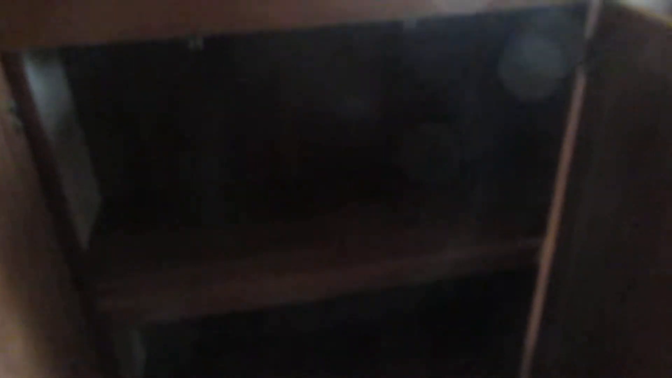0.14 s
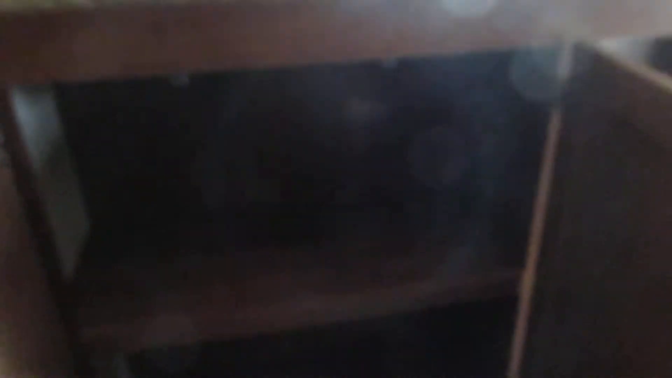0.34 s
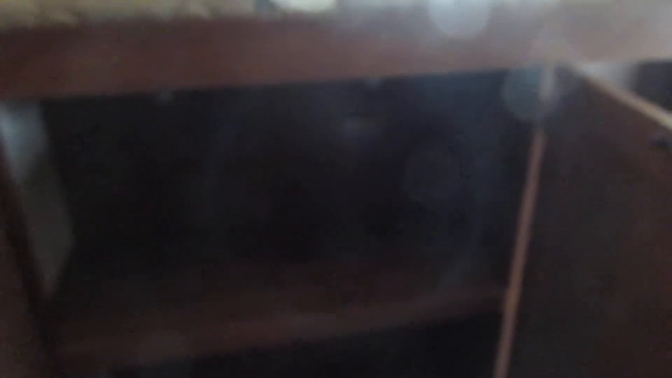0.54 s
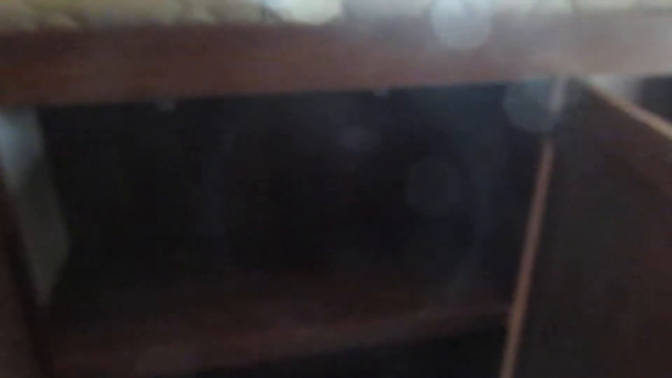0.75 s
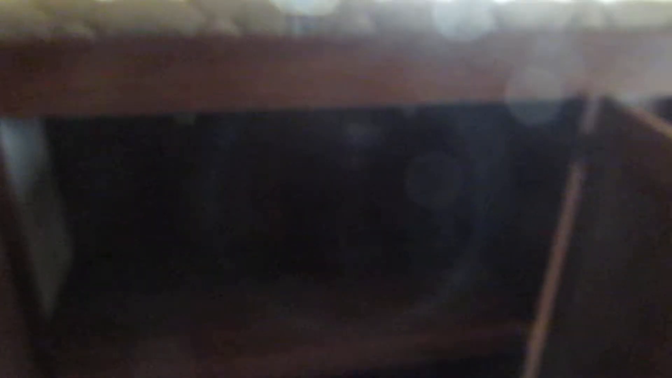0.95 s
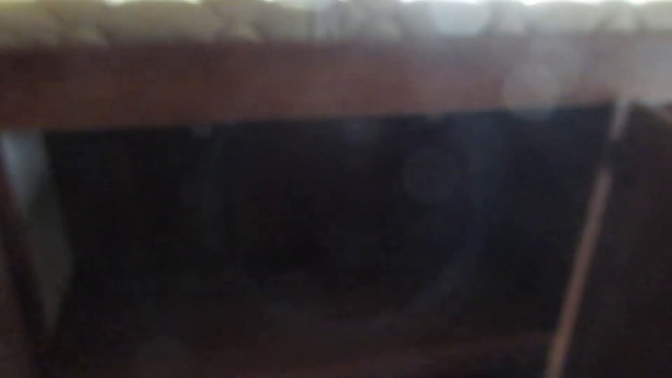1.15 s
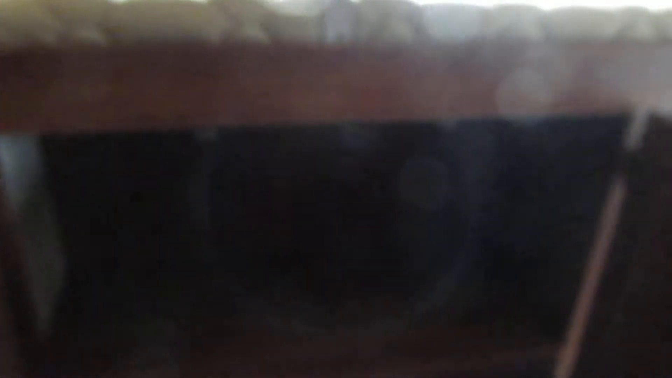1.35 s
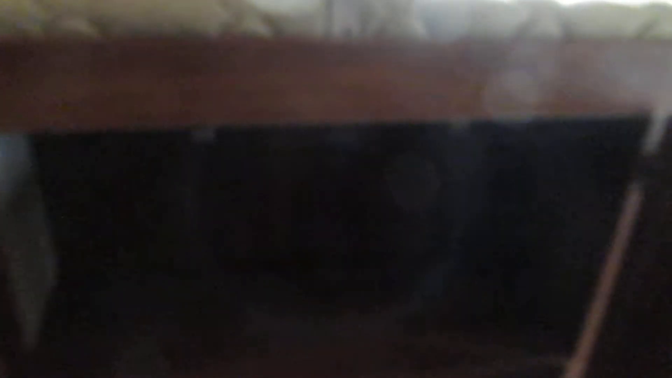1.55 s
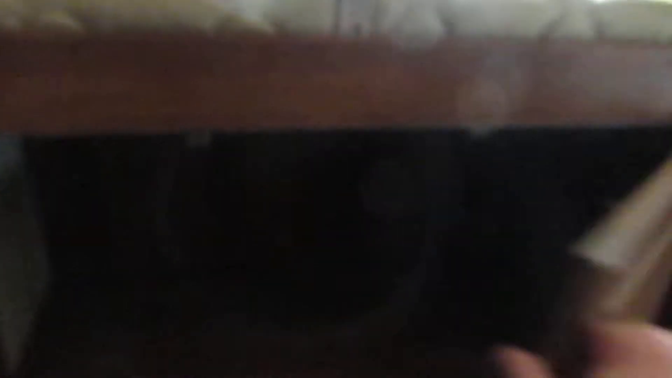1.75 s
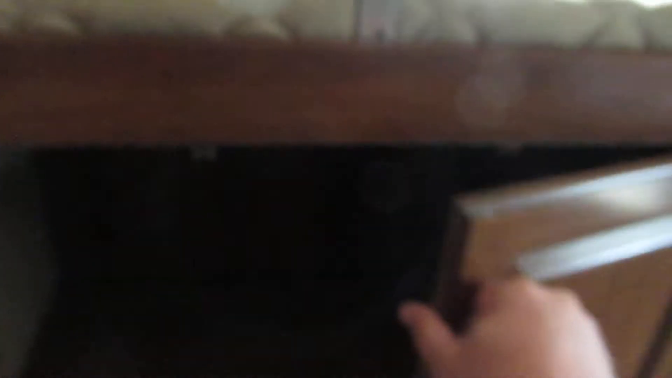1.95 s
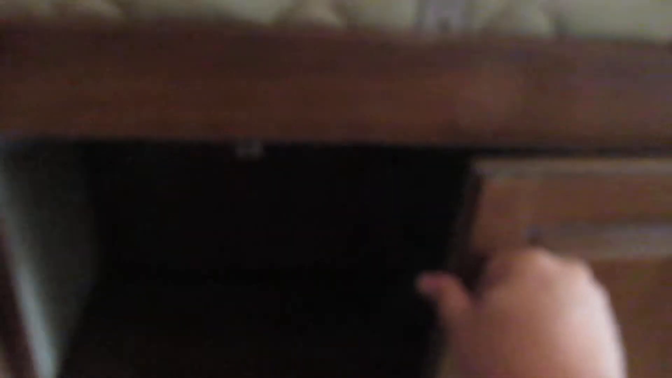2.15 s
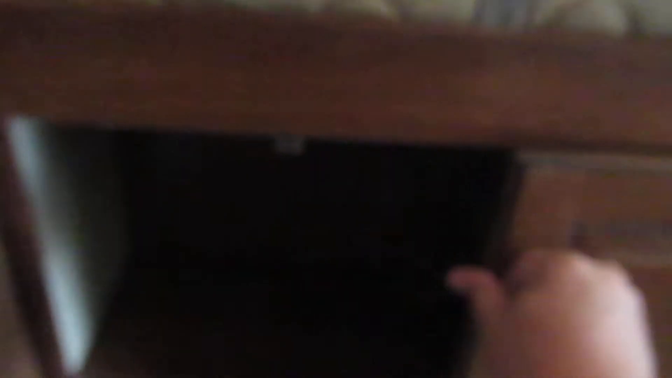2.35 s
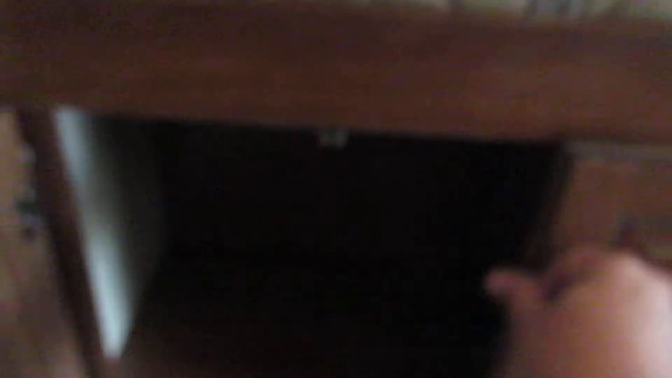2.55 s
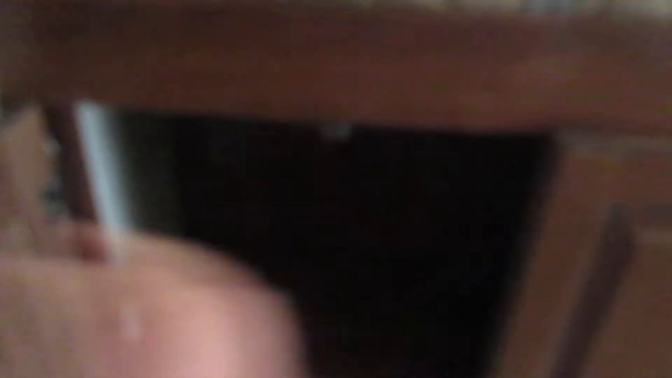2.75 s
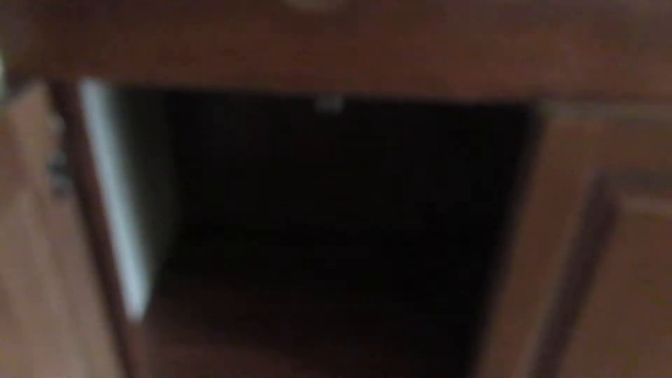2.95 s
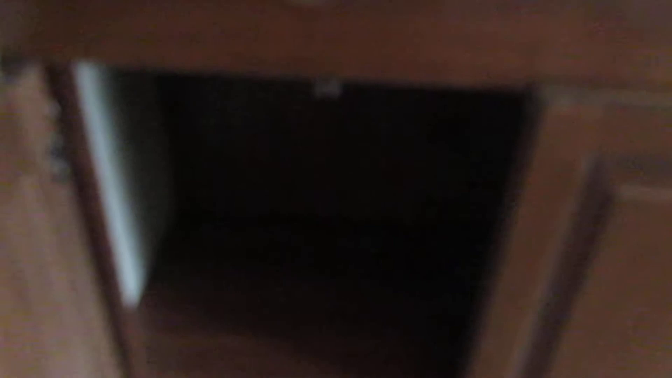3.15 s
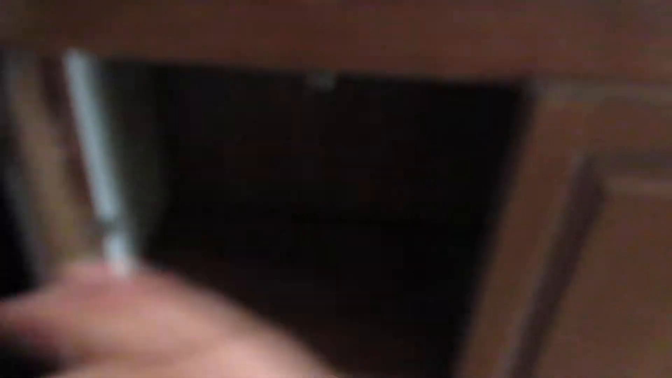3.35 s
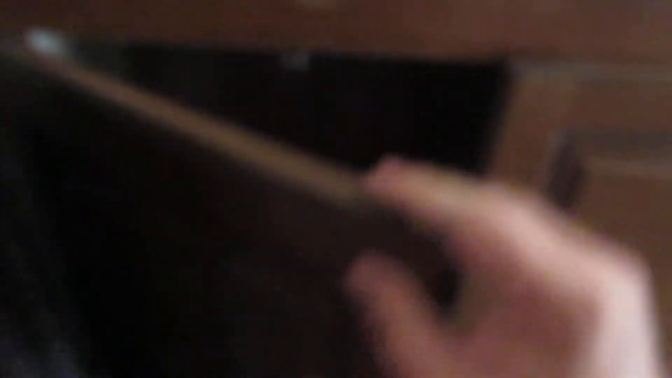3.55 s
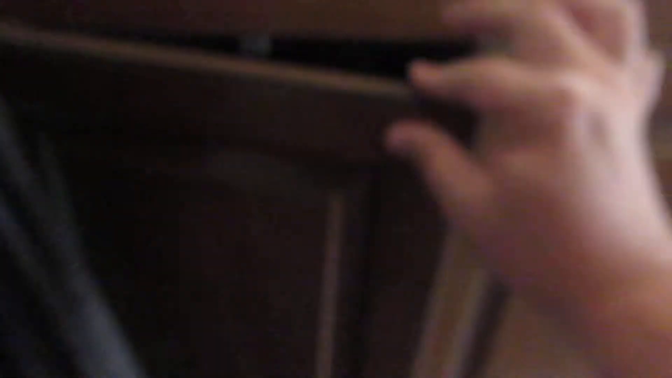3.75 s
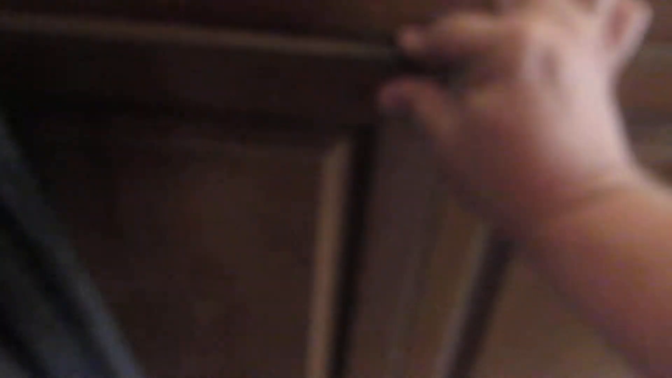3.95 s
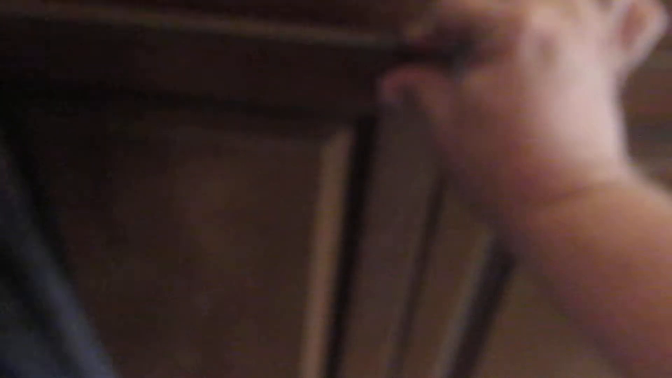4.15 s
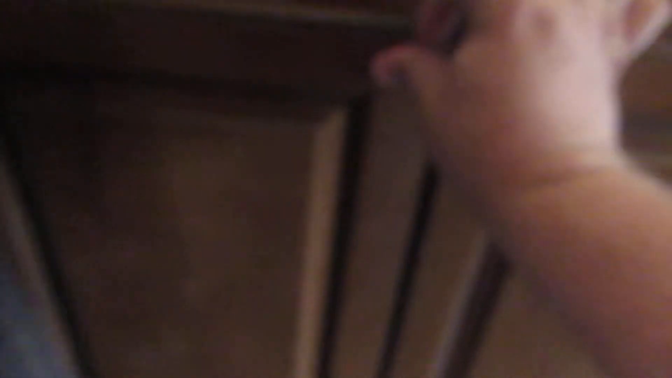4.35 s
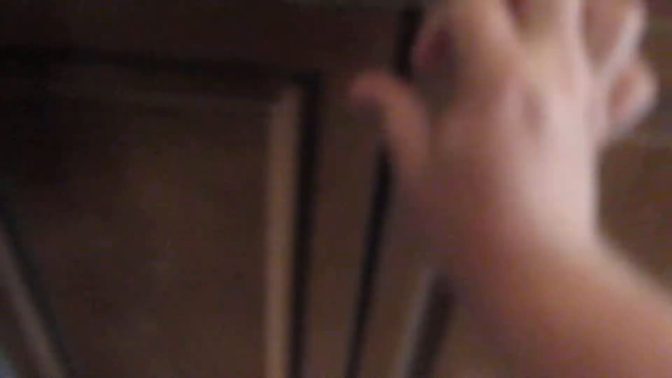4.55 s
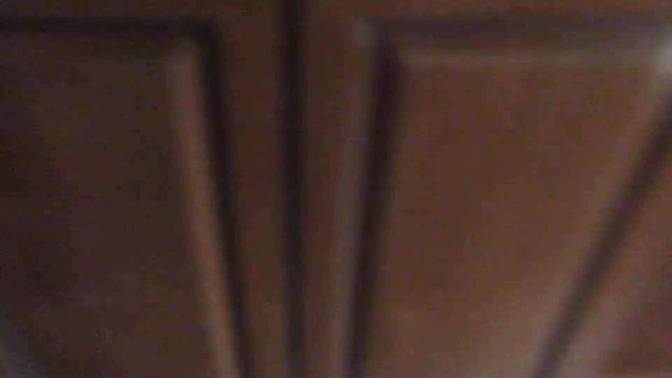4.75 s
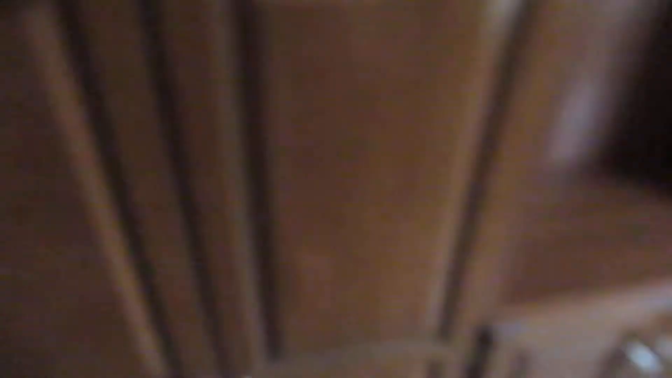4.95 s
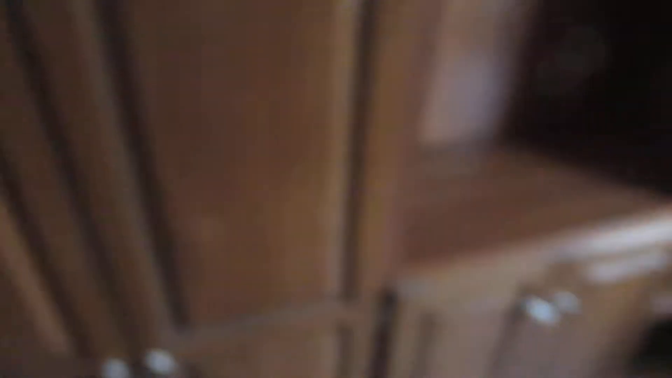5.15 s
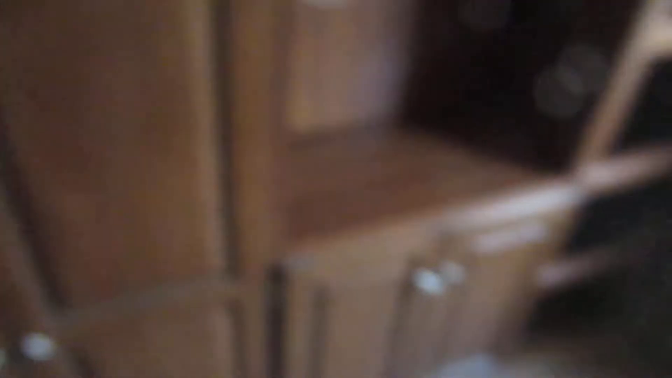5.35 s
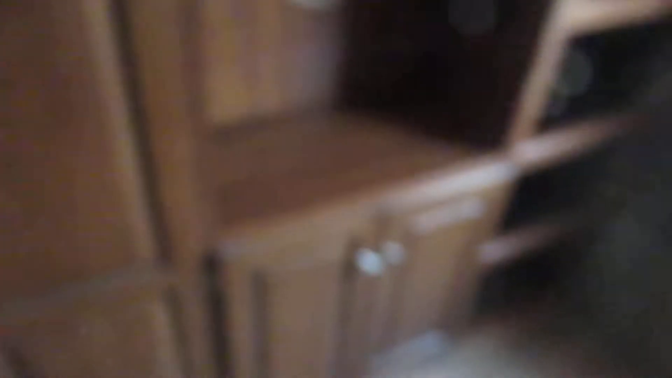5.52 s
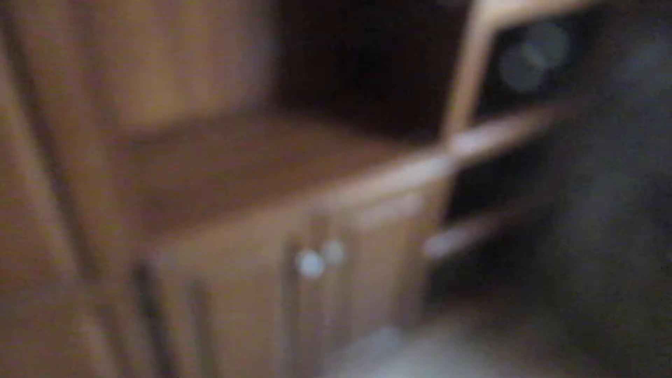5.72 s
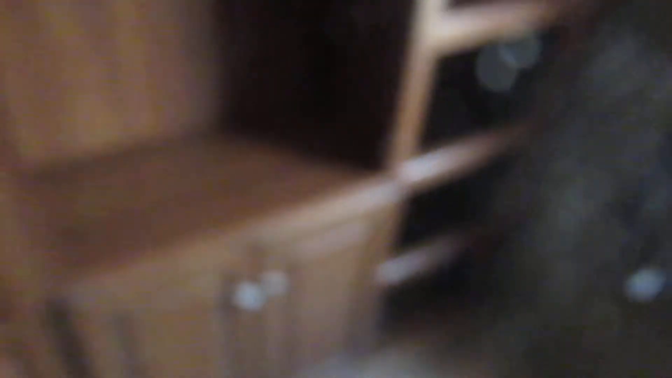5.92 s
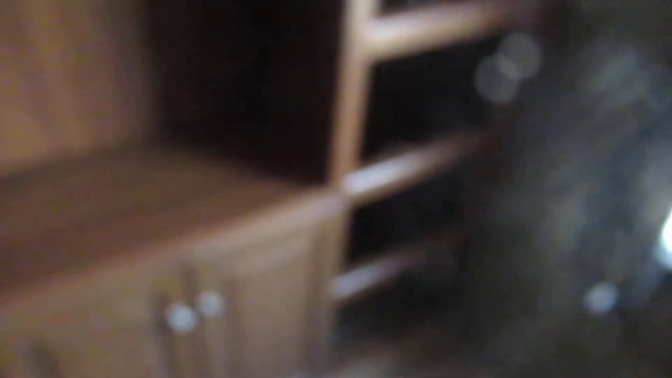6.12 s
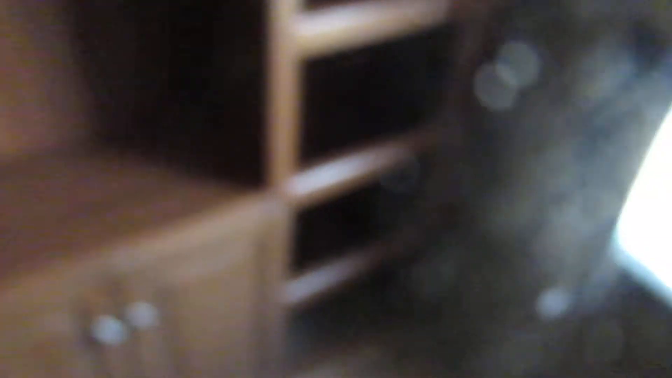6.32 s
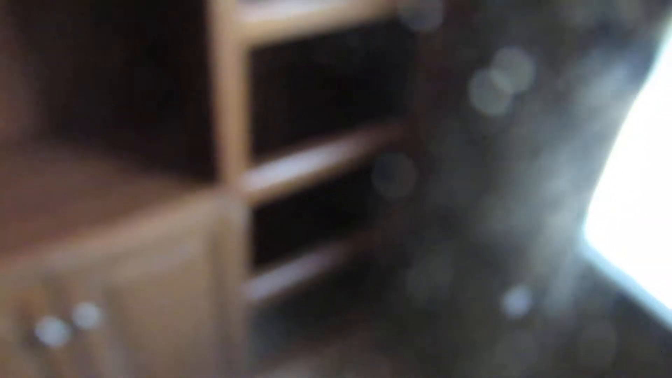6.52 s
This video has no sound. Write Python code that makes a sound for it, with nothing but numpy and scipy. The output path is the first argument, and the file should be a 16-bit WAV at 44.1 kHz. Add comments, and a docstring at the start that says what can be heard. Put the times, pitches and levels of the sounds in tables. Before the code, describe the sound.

Two wooden cabinet doors are pushed shut one after the other with loud, clattering bangs and metallic catch clicks over soft room hiss.

```python
"""Cabinet doors slamming in a small room

Two wooden cabinet doors in a trailer are pushed shut by hand, close by: modal ringing and dense panel noise in
runs of contacts. Spring catches click and ring; knocks, scuffs and steps are noise bursts, creaks rising chirps.
Shaped noise gives rumble, murmur and hiss beneath a faint hum, fleeting tones and thin gliding squeaks.
An automatic gain control ducks after each slam, so the room hiss sinks and comes back."""
import sys
import numpy as np
from scipy import signal
from scipy.fft import rfft, irfft, next_fast_len
from scipy.io import wavfile
from scipy.ndimage import uniform_filter1d, minimum_filter1d, map_coordinates

SR = 44100
rng = np.random.default_rng(int(sys.argv[2]) if len(sys.argv) > 2 else 0)


def put_to_file(sound):
    """Save the sound as 16-bit audio at rate SR, in the file named by the first command-line argument."""
    columns = np.atleast_2d(sound).T  # one column per channel
    safe = np.clip(columns, -1, 1)
    whole_steps = np.round(safe * 32767)
    wavfile.write(sys.argv[1], SR, whole_steps.astype(np.int16))


N = 294523
TIME = np.arange(N) / SR
AGE = np.arange(2 ** 15) / SR  # time since a contact [s]

# background level that murmur and hiss follow: (time [s], level [dB])
BACKGROUND = [(0, -55.5), (.55, -51), (2.2, -51), (3.15, -54), (4.2, -52), (4.9, -54), (5.6, -57),
              (6.1, -50.5), (6.6, -50)]
# colours of the murmur, hiss and rumble of the air: (frequency [Hz], relative level [dB per Hz])
AIR_BODY = [(150, -4.5), (250, 2), (600, -3.5), (1300, -6.5), (2500, -9), (4500, -17), (9000, -41.5)]
AIR_HISS = [(1000, -30.5), (3500, -2.5), (6000, -0.5), (10000, -5), (15000, -13)]
RUMBLE = [(10, -11), (25, -2.5), (50, -5), (74, 2.5), (100, -4.5), (170, -7.5), (300, -25.5), (1000, -56.5)]
# reverberation of the room: (frequency [Hz], 60 dB decay time [s])
ROOM = [(70, 0.7), (170, 0.45), (400, 0.28), (1400, 0.29), (4000, 0.23), (12000, 0.24)]
# faint tones in the background: (start [s], end [s], frequency [Hz], level [dB])
TONES = [(-.1, .25, 539, -60.5), (1.99, 2.287, 2150, -57.5), (2.815, 3.302, 494, -56.5),
         (3.15, 3.7, 1240, -68), (3.4, 4.104, 1115, -62.5), (5.396, 6.197, 204.6, -58)]
# thin squeaks at the edge of hearing: (start [s], end [s], first pitch [Hz], last pitch [Hz], level [dB])
SQUEAKS = [(1.61, 1.703, 8600, 9400, -55), (3.0, 3.2, 8300, 11400, -59), (3.3, 3.636, 10360, 8500, -59),
           (4.91, 5.0, 10300, 11200, -63), (5.0, 5.13, 11200, 8600, -62), (5.18, 5.516, 9160, 9500, -65)]
# wood creaking under a hand: (time [s], length [s], starting pitch [Hz], level [dB])
CREAKS = [(1.052, 0.048, 349.5, -40.5), (5.214, 0.0393, 1032, -40)]
# harmonics of a creak, from the fundamental up: (level [dB])
CREAK_PARTIALS = [-5, -1.5, -7.5, -9]
# light knocks on the woodwork: (time [s], level [dB], bass [dB], treble [dB], rise [s], favoured note [Hz])
KNOCKS = [(.359, -37, -1, -3, .0007, 2900), (1.262, -45, 3, 3.5, .0012, 1570),
          (1.594, -37.5, 10, -3.5, 0.0015, 140), (4.546, -41, -6, -4.5, 0.0048, 3000),
          (5.018, -43.5, 5, -10, 0.0017, 840), (5.297, -41.5, -17, 3.5, .0018, 5530),
          (6.6259, -28, 1, 2, .0004, 554)]
# hands and sleeves brushing the wood: (time [s], level [dB], treble [dB], rise [s], favoured note [Hz])
SCUFFS = [(.405, -35.5, -6.5, 0.056, 700), (.686, -37.5, 1, 0.034, 1730), (1.072, -40.5, 0, 0.012, 800),
          (1.19, -47, 3.5, 0.0031, 1110), (1.66, -40.5, -1.5, 0.025, 2090),
          (2.975, -44.5, -5.5, 0.018, 1695), (3.501, -45, 8.5, .035, 4500), (4.80, -45.5, 0.5, 0.015, 2820),
          (5.06, -44, -26, .02, 344), (5.222, -41, 3.5, 0.011, 2380), (5.7, -45, 6.5, 0.042, 5000)]
# soft footfalls through the floor: (time [s], level [dB])
STEPS = [(1.338, -33), (1.401, -36.5)]
# what the floor rings with: (frequency [Hz], relative level [dB], 60 dB decay time [s])
FLOOR_MODES = [(105, 1, .15), (147, -5, 0.13)]
# scrape of the sole: (bass [dB], treble [dB], rise [s], favoured note [Hz], note boost [dB])
SOLE_TOUCH = (5, -18, 0.04, 300, 7.5)
# spring catches snapping:
# (time [s], level [dB], ring [dB], treble [dB], rise [s], favoured note [Hz], note boost [dB])
CATCHES = [(2.2405, -27.5, 4, 4.5, .0012, 3270, 19.5), (2.2488, -19, 2.5, -2, 0.00026, 3500, 13.5),
           (2.4485, -18, -17, 6.5, 0.00017, 12000, 11.5), (4.020, -35.5, -11, -12.5, 0.0012, 2700, 20.5),
           (4.268, -34, -15, -4, .0002, 3700, 6), (6.038, -24.5, -22, 0.5, .005, 1130, 3),
           (6.065, -25, -5.5, 4, 0.0012, 3060, 9), (6.283, -37, -20, 10.5, 0.0027, 2120, 7)]
# modes of the steel spring: (frequency [Hz], relative level [dB], 60 dB decay time [s])
SPRING_MODES = [(2290, -7.5, 0.14), (2664, -9, 0.12), (3320, -1.5, .11), (3530, -2.5, .14),
                (3700, -6.5, 0.14), (3820, -11.5, 0.23), (4730, -13, 0.19), (7280, -13, .1)]
# colours of dense vibration in metal and woodwork: (frequency [Hz], relative level [dB per Hz])
METAL = [(100, -16), (500, 1.5), (1500, 1.5), (3300, -2), (4800, -6), (8000, -8.5), (15000, -23)]
WOODWORK = [(40, -11), (120, -4.5), (300, 3), (600, -2), (1100, -4.5), (2500, -7.5), (5000, -12),
            (15000, -25.5)]
# blows of each door, each a run of contacts: (time [s], level [dB], contacts [count], first gap [s],
# loss per contact [dB], bass [dB], treble [dB], rise [s], favoured note [Hz], note boost [dB])
RIGHT_DOOR = [(2.250, -16, 3, .013, 3, 4.5, -3.5, .0009, 1288, 5),
              (2.303, -28, 4, 0.027, 2, 5.5, -4, 0.0024, 307, 13),
              (2.434, -28, 2, 0.012, -13, -1.5, 6.5, .001, 420, 1),
              (2.4555, 6, 5, .006, 4, -2.5, 0, .0004, 1690, 4.5)]
LEFT_DOOR = [(4.024, -32, 5, .011, 1.5, 6, -3, 0.0041, 314, 10.5),
             (4.285, -30, 2, 0.022, -3, 0, -24, .003, 1630, 12),
             (4.317, -3, 3, .006, -0.4, 0, -2, .0004, 1550, 3),
             (4.3405, 1.5, 2, .002, 3, 1.5, 0.5, .0008, 260, 8)]
# strongest modes of each door: (frequency [Hz], relative level [dB], 60 dB decay time [s])
RIGHT_MODES = [(71.8, -9.5, 0.46), (159, -8, 0.52), (315, -5, 0.27), (377, -7.5, 0.17), (635, -3, 0.097),
               (740, -2, 0.14), (816, -2.5, .15), (850, -2, 0.24), (1054, -5, 0.1), (1269, 0, 0.19),
               (1377, -12, 0.18), (1606, -3, 0.083), (1880, -9.5, 0.2), (1968, -5, 0.19), (2410, -8, .15),
               (2390, -3.5, 0.11), (2610, -8, .15)]
LEFT_MODES = [(91.5, -10, 0.45), (132, -19, 0.64), (161, -13.5, .4), (244.5, 3, 0.14), (343, 1, 0.13),
              (467, 1.5, 0.11), (573.3, 0, 0.097), (741, -1.5, .18), (812, -15, 0.14), (853, -13.5, 0.64),
              (1077, -2, 0.23), (1415, -10, 0.3), (1536, -8, .14), (1686, -4.5, .18), (1840, -17, 0.24),
              (2050, -13, 0.2), (3020, -19, .18)]
# colour of each door's dense panel vibration: (frequency [Hz], relative level [dB per Hz])
RIGHT_PANEL = [(24, -60), (40, -29), (64, -5), (142, -2.5), (251, -3), (298, -2), (338, -9), (582, -8),
               (676, -7.5), (1460, -10.5), (3390, -14.5), (4230, -21), (13900, -41.5), (15000, -50)]
LEFT_PANEL = [(24, -60), (40, -26), (74, -7.5), (200, -5.5), (321, -5.5), (401, -12), (466, -10.5),
              (597, -4), (956, -9), (1650, -10.5), (2920, -16.5), (3220, -17), (3740, -21), (15000, -48.5)]

MURMUR_DB, HISS_DB = 2, -5  # relative to the background level
RUMBLE_DB = -51.5
SQUEAK_ARCH = .03  # share by which the pitch bows up mid-squeak
CREAK_CLIMB, CREAK_JITTER = .27, .025  # rise and unsteadiness, as shares of the starting pitch
CREAK_ROOM_DB = -0.5  # the room's answer relative to the chirp
KNOCK_NOTE_DB = 6.5  # boost of the note that each struck spot favours
SCUFF_BASS_DB, SCUFF_NOTE_DB = -7, 5
SOLE_DB = -7
GAP_GROWTH, DULLING_DB = 1.3, 1.5  # each gap over the one before; treble lost per contact
TOP_HZ = 15300  # upper band limit


def amp(db):
    """Level: 20 dB is a factor of ten in amplitude."""
    return 10 ** (np.asarray(db) / 20)


def unit(x):
    """Normalisation: scale to an rms amplitude of 1."""
    return x / np.sqrt(np.mean(x ** 2) + 1e-20)


def along(points, hz):
    """Logarithmic frequency: (frequency [Hz], value) points are joined by lines on a log axis."""
    f, v = np.transpose(points)
    return np.interp(np.log(hz + 1), np.log(f + 1), v)


def add(track, s, sound):
    """Superposition: pressures add, so mix a sound into the track at time s."""
    start = round(s * SR)
    track[start:start + len(sound)] += sound[:N - start]


def wobble(rate):
    """Random modulation: a smooth curve through rate random knots a second."""
    knots = rng.standard_normal(int(N * rate / SR) + 4)
    return map_coordinates(knots, [TIME * rate])


def noise(spectrum, size):
    """Random-phase noise: the spectrum sets its colour; reflections off the close walls ripple it."""
    hz = np.fft.rfftfreq(size, 1 / SR)
    ripple = map_coordinates(rng.standard_normal(400), [hz / 70])
    depth_db = 2.2 * np.interp(hz, [150, 450, 3000, 9000], [0, 1, 1, .4])
    gain = amp(along(spectrum, hz) + ripple * depth_db)
    phases = np.exp(2j * np.pi * rng.random(len(hz)))
    return unit(irfft(phases * gain, size))


def clatter(spectrum, touch, t60, room_db, build=0.11, note_width=0.11):
    """High modal density: countless close modes act as noise, a fast-dying blow plus room decay by band."""
    bass_db, treble_db, rise, note_hz, note_db = touch
    hz = np.fft.rfftfreq(len(AGE), 1 / SR)
    centres = np.geomspace(50, 14000, 10)
    # overlapping triangular bands on a log axis
    shares = np.array([np.interp(np.log(hz + 1), np.log(centres), row) for row in np.eye(len(centres))])
    tilt = amp(along([(130, bass_db), (600, 0.0028), (2000, 0.0084), (7000, treble_db)], hz))
    note = 1 + (amp(note_db) - 1) / (1 + ((hz / note_hz - 1) / note_width) ** 2)
    bands = irfft(rfft(noise(spectrum, len(AGE))) * tilt * note * shares)
    # low bands need part of a cycle to get moving
    onset = 1 - np.exp(-AGE / (rise + build / centres[:, None]))
    # a slow touch also dies more slowly
    blow = amp(-60 * AGE / (t60 + 10 * rise))
    room = amp(room_db - 60 * AGE / along(ROOM, centres)[:, None])
    return np.sum(bands * onset * np.hypot(blow, room), axis=0)


def ring(modes, rise, scatter_db=2):
    """Modal synthesis: decaying sinusoids, with new strengths and phases at each contact."""
    hz, db, t60 = np.transpose(modes)[:, :, None]
    gain = amp(db + scatter_db * rng.standard_normal(hz.shape)) / np.linalg.norm(amp(db))
    waves = np.sin(2 * np.pi * (hz * AGE + rng.random(hz.shape)))
    decay = amp(-60 * AGE / t60)
    onset = 1 - np.exp(-AGE / (rise + .5 / hz))
    return np.sum(gain * waves * decay * onset, axis=0)


def air():
    """Broadband ambience: one background level drives murmur and hiss, over steady rumble and a faint hum."""
    level_db = np.interp(TIME, *np.transpose(BACKGROUND))
    murmur = amp(level_db + MURMUR_DB + 1.3 * wobble(25)) * noise(AIR_BODY, N)
    hiss = amp(level_db + HISS_DB + 0.87 * wobble(30)) * noise(AIR_HISS, N)
    rumble = amp(RUMBLE_DB) * noise(RUMBLE, N)
    hum = amp(-61) * np.sin(2 * np.pi * 74 * TIME + 0.84 * wobble(8.1))
    return murmur + hiss + rumble + hum


def tones():
    """Phase modulation: each faint sinusoid swells, wavers and fades."""
    track = np.zeros(N)
    for start, end, hz, db in TONES:
        swell = np.sin(np.pi * np.clip((TIME - start) / (end - start), 0, 1))
        wave = unit(np.sin(2 * np.pi * hz * TIME + 1.2 * wobble(18)))
        track += amp(db) * swell * wave
    return track


def squeaks():
    """Frequency glide: thin, broken treble tones, each swelling and fading in several rough strands."""
    track = np.zeros(N)
    # (pitch ratio, amplitude share) of each strand
    for strand, share in [(.96, .35), (1, .75), (1.05, .4), (1.4, .18)]:
        waver = 1 + .008 * wobble(900) + .008 * wobble(30)
        flicker = unit(amp(4 * wobble(35))) * share
        for start, end, first_hz, last_hz, db in SQUEAKS:
            on = (TIME > start) & (TIME < end)
            progress = (TIME[on] - start) / (end - start)
            swell = np.sin(np.pi * progress)
            glide = first_hz + (last_hz - first_hz) * progress
            pitch = glide * (1 + SQUEAK_ARCH * swell)
            phase = 2 * np.pi * np.cumsum(strand * pitch * waver[on]) / SR
            track[on] += amp(db) * swell * flicker[on] * unit(np.sin(phase))
    return track


def creaks(room_t60=0.32):
    """Stick-slip: wood slips ever faster as the load grows, a short rising chirp answered by the room."""
    track = np.zeros(N)
    for s, length, hz, db in CREAKS:
        progress = np.clip(AGE / length, 0, 1)
        pitch = hz * (1 + CREAK_CLIMB * progress + CREAK_JITTER * wobble(656)[:len(AGE)])
        phase = 2 * np.pi * np.cumsum(pitch) / SR
        harmonics = sum(amp(level) * np.sin(k * phase) for k, level in enumerate(CREAK_PARTIALS, 1))
        chirp = np.sin(np.pi * progress) * harmonics
        tail = rng.standard_normal(len(AGE)) * amp(-60 * AGE / room_t60)
        answer = signal.fftconvolve(chirp, tail / np.linalg.norm(tail))[:len(AGE)]
        add(track, s, amp(db) * (chirp + amp(CREAK_ROOM_DB) * answer))
    return track


def bumps(grain_db=2.0):
    """Contact excitation: hands and feet on the woodwork; slow ones are scuffs that stick and slip."""
    track = np.zeros(N)
    for s, db, *touch in KNOCKS:
        knock = clatter(WOODWORK, (*touch, KNOCK_NOTE_DB), t60=0.081, room_db=0.0)
        add(track, s, amp(db) * knock)
    for s, db, *touch in SCUFFS:
        scuff = clatter(WOODWORK, (SCUFF_BASS_DB, *touch, SCUFF_NOTE_DB), t60=0.12, room_db=1.3)
        add(track, s, amp(db) * scuff)
    for s, db in STEPS:
        sole = clatter(WOODWORK, SOLE_TOUCH, t60=0.11, room_db=-4)
        add(track, s, amp(db) * (2 * ring(FLOOR_MODES, rise=.002) + amp(SOLE_DB) * sole))
    return track * amp(grain_db * wobble(220))


def catches():
    """Impulsive excitation: a hard metal click, and the steel spring rings on."""
    track = np.zeros(N)
    for s, db, ring_db, treble_db, rise, note_hz, note_db in CATCHES:
        click = clatter(METAL, (0, treble_db, rise, note_hz, note_db), t60=0.059, room_db=-10.0)
        add(track, s, amp(db) * (click + amp(ring_db) * ring(SPRING_MODES, rise)))
    return track


def door(blows, panel, modes, t60, room_db, ring_db):
    """Repeated impact: a door chatters on catch and frame, gaps widening and each contact in a run duller."""
    track = np.zeros(N)
    for s, db, contacts, gap, loss_db, bass_db, treble_db, rise, *note in blows:
        # the blow's bass tilt also weights the low modes
        struck = [(hz, level + along([(300, bass_db), (700, 0)], hz), life) for hz, level, life in modes]
        for k in range(round(contacts)):
            touch = (bass_db, treble_db - DULLING_DB * k, rise, *note)
            slam = clatter(panel, touch, t60, room_db)
            ringing = amp(ring_db) * ring(struck, rise)
            add(track, s, amp(db - loss_db * k) * (slam + ringing))
            s = s + gap * GAP_GROWTH ** k
    return track


def scene():
    """Superposition of the background, the person in the room, the catches and both doors."""
    background = air() + tones() + squeaks()
    person = creaks() + bumps()
    right = door(RIGHT_DOOR, RIGHT_PANEL, RIGHT_MODES, t60=0.09, room_db=-9, ring_db=-4.0)
    left = door(LEFT_DOOR, LEFT_PANEL, LEFT_MODES, t60=0.028, room_db=-14, ring_db=-9.5)
    return (background + person + catches() + right + left)[None]


def gain_control(x, limit_db=-8.0, hold=0.38, release_db=38):
    """Dynamic compression: loud sound cuts the gain at once; it holds, then climbs release_db a second."""
    level_db = 10 * np.log10(np.abs(uniform_filter1d(x ** 2, size=200)) + 1e-12)
    half = int(hold * SR / 2)
    # the lowest gain of the past hold seconds
    held_db = minimum_filter1d(np.minimum(limit_db - level_db, 0), 2 * half + 1, origin=half)
    climb_db = release_db * TIME
    gain_db = np.minimum.accumulate(held_db - climb_db) + climb_db
    return x * amp(uniform_filter1d(gain_db, size=64))


def record(dry):
    """Nonlinear and linear limits: gain control, clipping at full scale, then a sharp low-pass."""
    x = np.clip(gain_control(dry[0]), -1, 1)
    size = next_fast_len(N + SR // 2)
    passed = np.fft.rfftfreq(size, 1 / SR) < TOP_HZ
    return irfft(rfft(x, size) * passed, size)[None, :N]


dry = scene()
out = record(dry)
put_to_file(out)
```